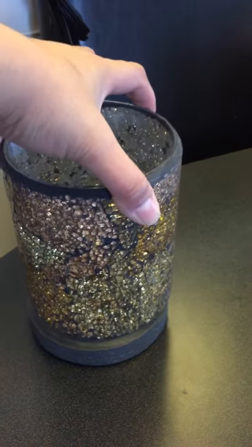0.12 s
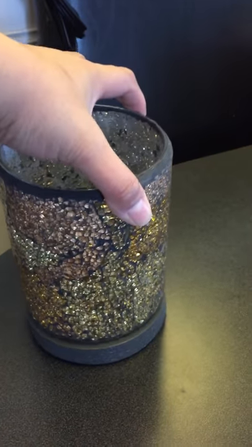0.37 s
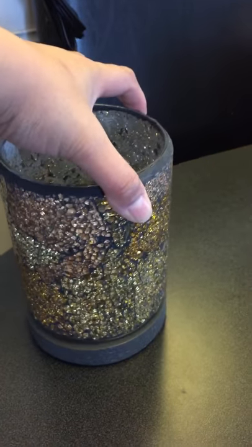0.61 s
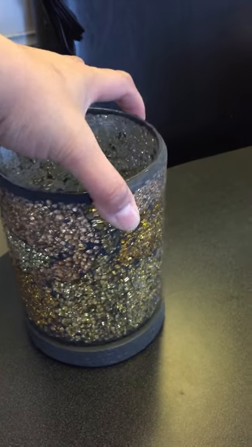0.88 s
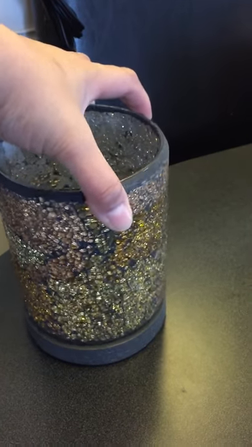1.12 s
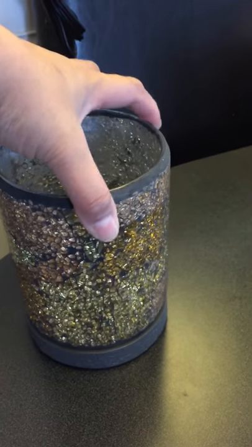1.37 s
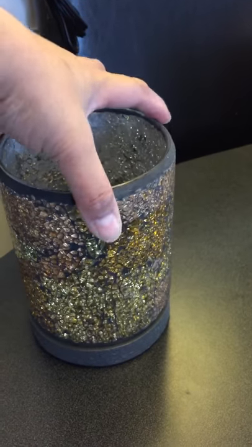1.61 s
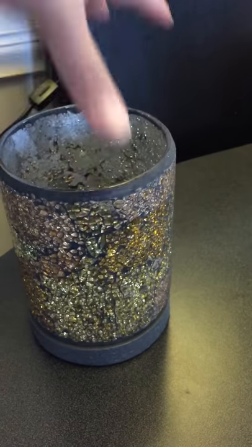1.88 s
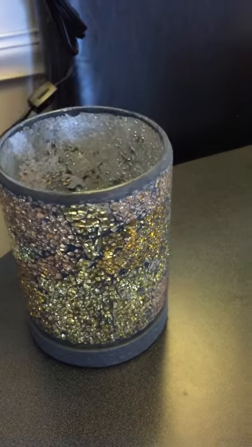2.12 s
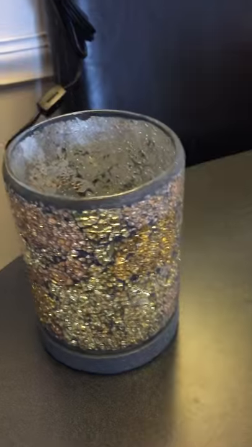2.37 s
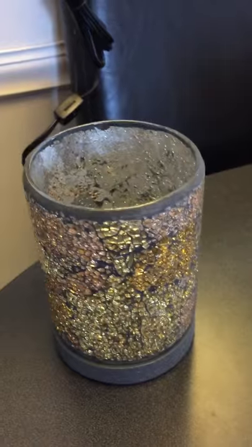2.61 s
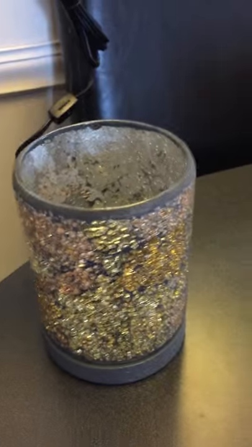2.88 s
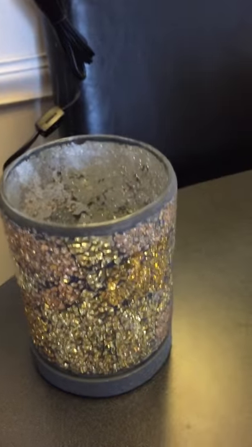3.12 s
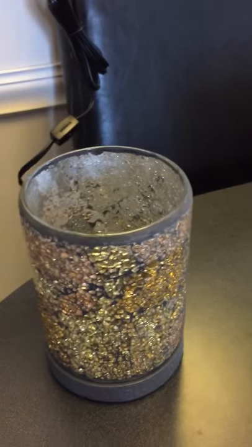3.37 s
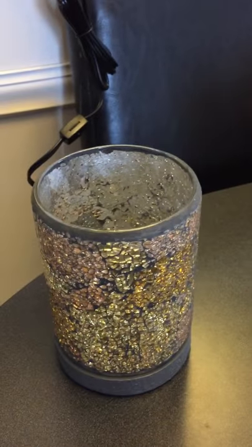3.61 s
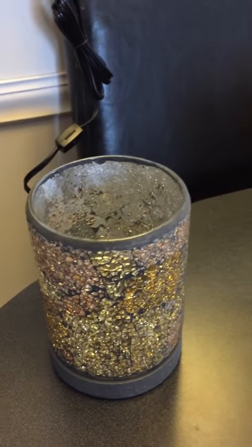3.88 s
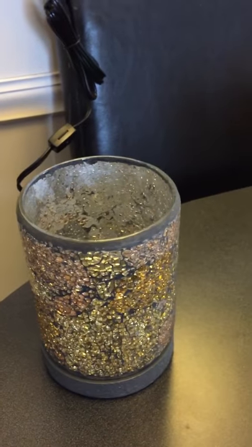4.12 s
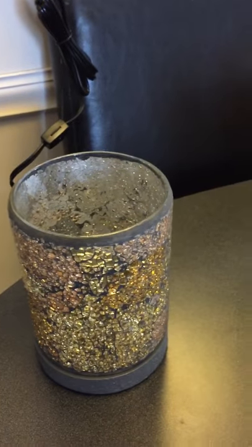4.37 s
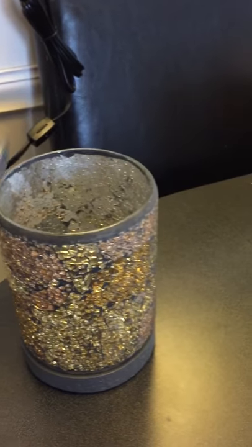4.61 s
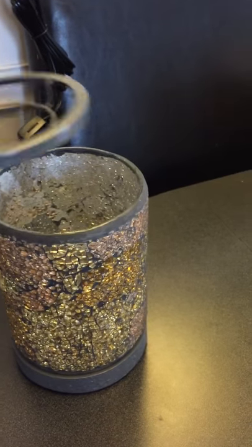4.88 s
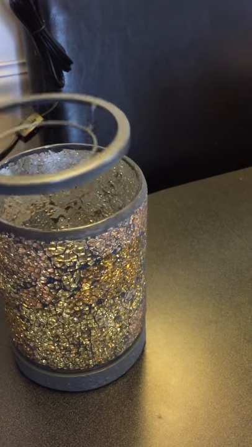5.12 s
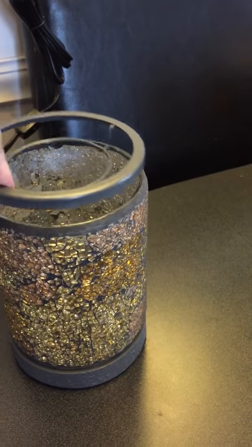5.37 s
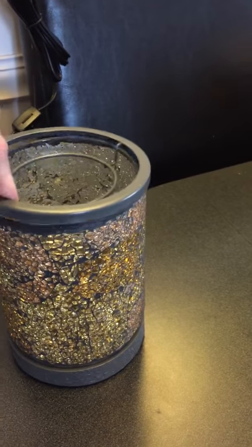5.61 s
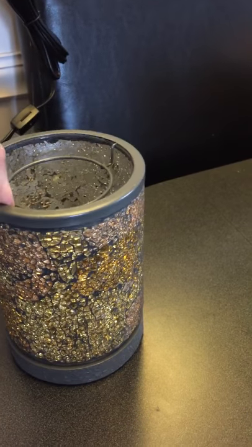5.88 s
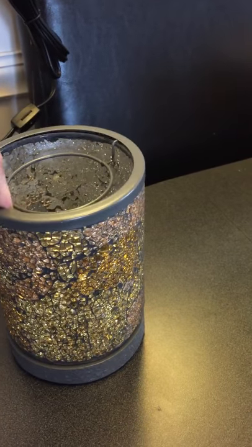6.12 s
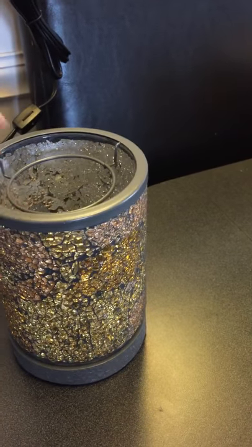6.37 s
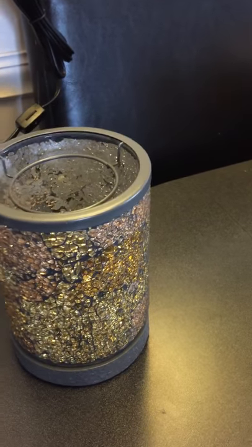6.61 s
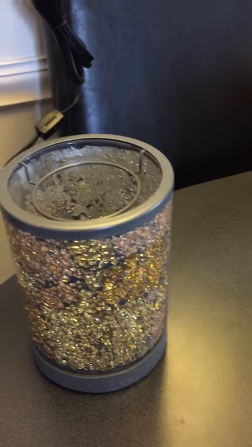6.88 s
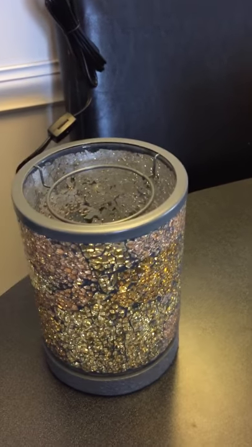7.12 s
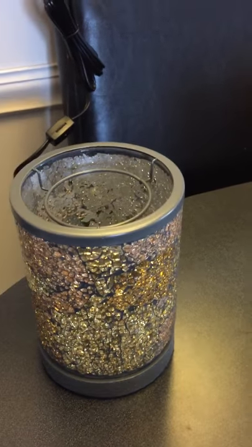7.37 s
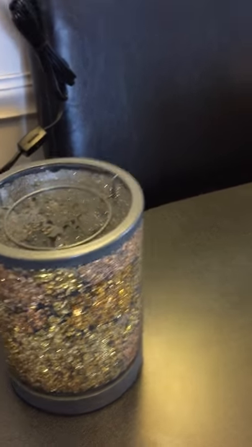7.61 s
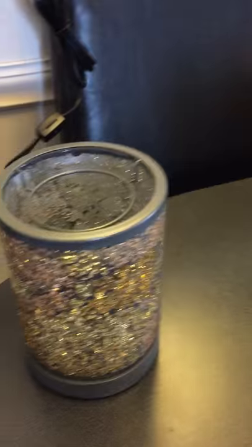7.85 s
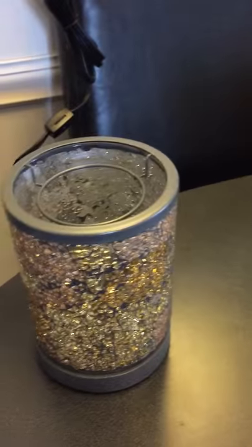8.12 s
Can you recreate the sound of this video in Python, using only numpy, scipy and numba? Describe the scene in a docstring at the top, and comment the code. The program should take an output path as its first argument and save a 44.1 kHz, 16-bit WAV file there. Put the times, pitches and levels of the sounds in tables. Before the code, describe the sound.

A glass lamp shade clacks and rocks onto its base, a metal ring scrapes and clinks into its rim, then a dish knocks; a clock ticks.

```python
"""Glass shade, metal ring and dish on a table

A hand seats a glass lamp shade on its base and lets it rock to rest; a metal ring is dragged off the table and
dropped into the rim; then a dish is slid and knocked about. A wall clock ticks over hum and hiss.
Blows excite banks of decaying modes plus a short noise clack; rubbing is random grit driving the same bodies.
Hum is wavering sines, hiss is coloured noise, and a decaying noise tail makes the room."""
import sys
import numpy as np
from scipy import signal
from scipy.fft import rfft, irfft
from scipy.io import wavfile
from scipy.ndimage import uniform_filter1d
from numba import njit

SR = 44100
rng = np.random.default_rng(int(sys.argv[2]) if len(sys.argv) > 2 else 0)


def to_wav(s):
    """Save 16-bit WAV."""
    ch = np.atleast_2d(s).T  # columns
    pcm = np.round(np.clip(ch, -1, 1) * 32767)  # PCM
    wavfile.write(sys.argv[1], SR, pcm.astype(np.int16))


def gain_from_decibels(decibels):
    """Convert decibel values to linear amplitude factors."""
    exponent = np.asarray(decibels, float) / 20
    return 10 ** exponent


N = 363384


def colour(x, points):
    """Minimum-phase filter, made by folding the cepstrum of a gain given as (f/Hz, level/dB) points."""
    hz, db = np.transpose(points)
    log_hz = np.log(np.linspace(1, SR / 2, 2049))
    cepstrum = irfft(np.interp(log_hz, np.log(hz), db) * np.log(10) / 20)
    cepstrum[1:2048] *= 2
    cepstrum[2049:] = 0
    return signal.fftconvolve(x, irfft(np.exp(rfft(cepstrum))))[:len(x)]


def level(x, db):
    """Set the rms."""
    return x * gain_from_decibels(db) / np.sqrt(np.mean(x ** 2))


def add(out, s, sound, peak_db):
    """Mix a sound in at time s with the given peak."""
    i = int(s * SR)
    out[i:i + len(sound)] += (sound * gain_from_decibels(peak_db) / np.abs(sound).max())[:N - i]


@njit
def resonate(force, poles, gains):
    """A bank of decaying modes driven by a force."""
    out = np.zeros(len(force))
    for p, g in zip(poles, gains):
        z = 0j
        for i in range(len(force)):
            z = z * p + force[i]
            out[i] += g * z.imag
    return out


SCATTER_DB, DETUNE = 2.5, .003  # per blow: default level spread, relative pitch spread of the modes


def ring_modes(force, modes, share=0.7, bright_hz=None, focus_db=11, scatter_db=SCATTER_DB):
    """Neighbouring modes start in opposite directions; where the contact lands decides which are strong.

    share scales every t60; focus_db is lost per octave away from bright_hz."""
    hz, db, t60_s = np.transpose(modes)
    if bright_hz:
        db = db - focus_db * np.abs(np.log2(hz / bright_hz))
    hz = hz * (1 + DETUNE * rng.standard_normal(len(hz)))
    decay = np.log(1000) / (t60_s * max(share, .05) * SR)
    poles = np.exp(2j * np.pi * hz / SR - decay)
    signs = (-1.) ** np.arange(len(hz))
    gains = signs * gain_from_decibels(db + scatter_db * rng.standard_normal(len(hz)))
    return resonate(force, poles, gains)


def push(ms):
    """Force of a blow: swells to its peak in ms (two samples at least), then lets go; soft contacts are slower."""
    u = np.arange(SR // 2) / SR / max(ms / 2000, 1 / SR)
    return u ** 2 * np.exp(-u)


def blow(ms, modes, share, clack_db, clack_ms, bright_hz=None, focus_db=10.0):
    """The modes of a struck thing, and the dense short clack of all those too close to tell apart."""
    force = push(ms)
    tone = ring_modes(force, modes, share, bright_hz, focus_db)
    fade = np.exp(-np.arange(len(force)) / (clack_ms * SR / 1000))
    dense = rng.standard_normal(len(force)) * fade
    clack = signal.fftconvolve(np.diff(dense, prepend=0), force)[:len(force)]
    return tone / np.abs(tone).max() + gain_from_decibels(clack_db) * clack / np.abs(clack).max()


def tick(hz, fade_ms):
    """Dry crack of two hard edges: fading noise in a wide band around hz."""
    t = np.arange(SR // 10) / SR
    noise = rng.standard_normal(len(t)) * np.exp(-1000 * t / fade_ms)
    edges_hz = [min(0.61 * hz, SR / 4), min(1.9 * hz, SR / 2.2)]
    return signal.sosfilt(signal.butter(2, edges_hz, "band", fs=SR, output="sos"), noise)


def grit(n, rate_hz, spread_db):
    """Friction over a rough top: dense small catches of random sign and uneven size."""
    chance = rng.random((3, n))
    size_db = np.minimum(-spread_db * np.log(1 - chance[2]), 14)
    return (chance[0] < rate_hz / SR) * np.sign(chance[1] - .5) * gain_from_decibels(size_db)


def rub(force, response):
    """A body, its response scaled to unit energy, driven by a rubbing force."""
    return signal.fftconvolve(force, response / np.sqrt(np.sum(response ** 2)))[:len(force)]


def strokes(rows):
    """Start sample and gain of a movement made of strokes that swell, hold and fade."""
    s, hold_s, db, swell, fade = np.transpose(rows)[:, :, None]
    i = int((s.min() - .1) * SR)
    t = np.arange(i, min(int((s.max() + .3) * SR), N)) / SR
    gain_db = db - swell * np.maximum(s - t, 0) - fade * np.maximum(t - s - hold_s, 0)
    return i, gain_from_decibels(gain_db).max(axis=0)


def walk(rate_hz):
    """Random levels, one each 1 / rate_hz s, joined by straight lines."""
    k = int(SR / rate_hz)
    return uniform_filter1d(np.repeat(rng.standard_normal(N // k + 1), k), k)[:N]


# room rumble and hiss spectrum: f/Hz, relative level/dB
HUSH_SPECTRUM = [(15, -39), (25, -6), (123, -4), (170, -8.5), (394, -17), (463, -18.5), (1230, -21),
                 (1330, -23.5), (1440, -20.5), (4250, -24.5), (4870, -28), (5880, -26), (10700, -32),
                 (13200, -31), (16000, -35.5)]
HUSH_RMS_DB = -68
# mains hum partials: f/Hz, mean level/dB
HUM_PARTIALS = [(120.5, -68.5), (1322, -87.5)]


def hush():
    """Room rumble and microphone hiss as coloured noise; mains hum as sines wavering in level and phase."""
    t = np.arange(N) / SR
    hum = np.zeros(N)
    for hz, db in HUM_PARTIALS:
        hum += gain_from_decibels(db + 2.0 * walk(8.9)) * np.sin(2 * np.pi * hz * t + 0.75 * walk(5.6))
    return level(colour(rng.standard_normal(N), HUSH_SPECTRUM), HUSH_RMS_DB) + hum


# clock ticks, a row a second: step peak level/dB, catch peak level/dB
CLOCK_TICKS = [(-48.5, -54), (-56, -55.5), (-54, -56), (-49.5, -51.5), (-48.5, -60.5), (-53, -55.5),
               (-45, -56), (-56.5, -57.5), (-46.5, -55)]
# clock modes: f/Hz, relative level/dB, t60/s at share 1
CLOCK_MODES = [(442, -1, 0.028), (658, -0.5, 0.033), (1265, -9, 0.041), (1813, -3, 0.024), (2212, 1, 0.023),
               (2852, -6, 0.041), (5570, -12, 0.046)]
FIRST_TICK_S, STEP_HZ, CATCH_LATE_S, COIL_S = .0785, 1330, .022, .013


def clock():
    """Once a second the coil hums up, the motor steps, the gears rattle, and the train catches."""
    out = np.zeros(N)
    t = np.arange(SR // 4) / SR
    for second, (step_db, catch_db) in enumerate(CLOCK_TICKS):
        s = FIRST_TICK_S + second
        coil = grit(len(t), 2900, 3.5) * (t < COIL_S)
        add(out, s - COIL_S, ring_modes(coil, CLOCK_MODES[2:3], 0.7), step_db - 16)
        add(out, s, blow(0.17, CLOCK_MODES[2:], 0.62, -22, 4, STEP_HZ, 15.), step_db)
        rattle = grit(len(t), 1500, 1.1) * t * np.exp(-t / 0.019)
        add(out, s, ring_modes(rattle, CLOCK_MODES, 0.52), catch_db - 5.0)
        add(out, s + CATCH_LATE_S, blow(0.074, CLOCK_MODES, 0.57, 0.39, 4.9), catch_db)
    return out


# shade against base: t/s, clack peak level/dB, table thud peak level/dB, contact/ms, strongest f/Hz
SHADE_KNOCKS = [(0.378, -37.5, -48, 0.21, 626), (.444, -22, -34.5, 0.22, 750),
                (0.583, -51.5, -57, 0.46, 600), (0.653, -44, -54, 0.22, 384), (.856, -51, -51, 0.26, 298),
                (0.94, -34.5, -54, 0.42, 650), (1.096, -41, -50, 0.35, 580), (1.149, -55, -76, 0.31, 600),
                (1.25, -54.5, -70, 0.36, 910), (1.321, -54, -73, 0.21, 650), (1.436, -51.5, -70, 0.25, 410),
                (1.465, -57.5, -68, 0.19, 700), (1.578, -42.5, -70, 0.58, 630),
                (3.281, -41, -61, 0.11, 278)]
# shade let go, rocking from edge to edge: t/s, clack peak level/dB
SHADE_ROCKS = [(1.728, -49.5), (1.779, -43), (1.827, -49), (1.869, -48.5), (1.91, -54), (1.947, -48),
               (2.014, -54), (2.076, -60)]
ROCK_MS, ROCK_HZ, ROCK_THUD_DB = 0.49, 600, -30  # thud re clack
# table rumble under the wobble: t/s at full force, hold/s, rms level/dB, swell/(dB/s), fade/(dB/s)
WOBBLE_STROKES = [(1.47, 0.018, -60, 350, 500), (1.585, 0.033, -47.5, 800, 650),
                  (1.745, 0.018, -55.5, 450, 250), (1.85, 0.14, -63.5, 500, 400),
                  (2.014, .01, -54, 250, 150), (2.115, 0.091, -61, 300, 550)]
# base modes: f/Hz, relative level/dB, t60/s at share 1
BASE_MODES = [(250, -3, .07), (330, -6, .1), (420, -8, .05), (590, -3, .035), (650, 0, .035),
              (851, -10, .045), (953, -7, .06), (1297, -7, .06), (1500, -1, .04), (1873, 2, .16),
              (1949, 5, .12), (2083, 4, .16), (2300, 7, .06), (3015, 14, .05), (3138, 8, .1),
              (4070, 5, .04)]
# table top modes: f/Hz, relative level/dB, t60/s at share 1
TABLE_MODES = [(75.3, -16, 0.19), (131, -4, 0.16), (147.5, -1.5, 0.048), (222, -7.5, 0.072),
               (334.2, -8, 0.22)]
# a shorter contact rings longer: t60 share at CONTACT_MS, factor per halving of the contact
CONTACT_MS, KNOCK_SHARE, SHARE_PER_HALVING = .3, 0.61, 1.26


def shade():
    """The glass clacks on the base, whose modes ring, and the table top booms under it."""
    out = np.zeros(N)
    rocks = [(s, db, db + ROCK_THUD_DB, ROCK_MS, ROCK_HZ) for s, db in SHADE_ROCKS]
    for s, clack_db, thud_db, ms, bright_hz in SHADE_KNOCKS + rocks:
        share = KNOCK_SHARE * SHARE_PER_HALVING ** np.log2(CONTACT_MS / ms)
        add(out, s, blow(ms, BASE_MODES, share, -16, 12.2, bright_hz, 11.8), clack_db)
        add(out, s + 0.0052, ring_modes(push(1.0), TABLE_MODES), thud_db)
    i, gain = strokes(WOBBLE_STROKES)
    rumble = ring_modes(rng.standard_normal(len(gain)), TABLE_MODES[1:3], 0.7)
    out[i:i + len(gain)] += gain * level(rumble, 0)
    return out


# faint treble scuffs, perhaps skin or cloth: t/s, peak level/dB, f/Hz
SCUFF_EVENTS = [(0.652, -62, 6340), (1.238, -62, 6400), (1.33, -64, 7450), (1.7, -62, 7500),
                (4.3, -61.5, 7400), (7.592, -59.5, 7040)]


def scuffs():
    """Short faint hisses: fading noise in a narrow treble band."""
    out = np.zeros(N)
    for s, db, hz in SCUFF_EVENTS:
        band = signal.butter(2, [hz / 1.58, hz * 1.32], "band", fs=SR, output="sos")
        add(out, s, signal.sosfilt(band, tick(hz, 19)), db)
    return out


# ring against board or rim: t/s, peak level/dB of what is hit, metal peak level/dB, tick peak level/dB,
# t60 share of what is hit, brightest metal f/Hz
RING_CLINKS = [(3.392, -24, -28.5, -47, 0.7, 9200), (3.407, -22.5, -46, -48, 0.085, 4500),
               (3.439, -31, -40, -58, 0.65, 6660), (3.568, -33.5, -66, -71, 0.68, 4400),
               (3.585, -38, -45.5, -53, 0.37, 3910), (3.619, -29, -46.5, -54.5, 0.68, 8540),
               (5.808, -34.5, -54.5, -73, 0.57, 4270), (5.817, -35.5, -71, -72, 1.65, 4330),
               (6.006, -36, -54, -63, 0.2, 6100), (6.019, -41.5, -70, -75, 0.36, 6100),
               (6.153, -55, -60, -38.5, 0.43, 13200), (6.161, -45.5, -59, -35.5, 1.2, 11000),
               (6.169, -32, -45.5, -56, 0.07, 4330), (6.226, -30, -32, -41, 0.42, 7900),
               (6.301, -38.5, -75, -72, 0.086, 4100), (6.311, -52, -45, -46, 0.73, 9900),
               (6.333, -38.5, -47, -33.5, 1.14, 6500), (6.342, -32.5, -39, -61, 0.095, 6050)]
# drag strokes: t/s at full force, hold/s, force level/dB, swell/(dB/s), fade/(dB/s)
DRAG_STROKES = [(3.35, .02, -68.5, 248, 299.5), (3.376, .01, -56.5, 600, 300.5),
                (3.393, 0.051, -33.5, 5000, 253), (3.571, .004, -43, 2499, 1199),
                (3.59, .04, -40, 3000, 323)]
# metal ring modes: f/Hz, relative level/dB, t60/s at share 1
METAL_MODES = [(4027, -9, .07), (4129, -10, .15), (4452, -8, .3), (5380, -12, .15), (6099, -7, .22),
               (6589, -6, .25), (6826, 0, .3), (7615, -4, .2), (7980, -8, .2), (8570, -2, .3),
               (9100, -12, .2), (9846, -3, .22), (10430, -10, .3), (11300, -10, .15), (11950, -9, .12),
               (13100, -10, .08), (14300, -12, .08)]
# glass shade modes: f/Hz, relative level/dB, t60/s at share 1
GLASS_MODES = [(420, -19, .06), (635, 0, .09), (690, -7, .06), (1150, -13, .05), (1500, -5, .075),
               (2000, -10, .04), (2540, -1, .05), (2900, -3, .05), (3170, 0, .07), (4450, 6, .05)]
# board modes: f/Hz, relative level/dB, t60/s at share 1
BOARD_MODES = [(679.3, -5.5, 0.08), (1360, -22.5, 0.15), (1600, -9.5, 0.042), (2083, -3, 0.034),
               (2863, -17.5, 0.066)]
# board rasp spectrum: f/Hz, relative level/dB
BOARD_RASP = [(59, -45), (100, -21.5), (477, -11.5), (560, -23), (684, 0), (772, -11), (1690, -14),
              (3910, -24.5), (4970, -30), (6850, -26), (12000, -53.5), (15600, -87.5), (22000, -120)]
GLASS_HZ, GLASS_FOCUS_DB = 640, 2.2
HARDEST_CONTACT_MS, DB_PER_DOUBLING = .05, 16  # the less the metal rings, the longer the contact
ON_RIM_S, METAL_SHARE_FREE, METAL_SHARE_ON_RIM = 5, .5, 0.24
GRIPPED_S, SING_DB, GRIPPED_DB = 3.54, -5.5, -25.5  # the metal sings while the ring is loose


def metal_ring():
    """Dragged, it rasps on the board and sings; dropped on the rim, it rings with the glass."""
    out = np.zeros(N)
    for s, hit_db, metal_db, tick_db, hit_share, bright_hz in RING_CLINKS:
        hit_modes, metal_share = GLASS_MODES, METAL_SHARE_ON_RIM
        if s < ON_RIM_S:
            hit_modes, metal_share = BOARD_MODES, METAL_SHARE_FREE
        ms = HARDEST_CONTACT_MS * 2 ** np.clip((hit_db - metal_db) / DB_PER_DOUBLING, 0, 2)
        add(out, s, blow(ms, hit_modes, hit_share, -12.5, 8.3, GLASS_HZ, GLASS_FOCUS_DB), hit_db)
        add(out, s + 0.00557, ring_modes(push(0.92), TABLE_MODES[1:]), hit_db - 18)
        add(out, s, ring_modes(push(.025), METAL_MODES, metal_share, bright_hz), metal_db)
        add(out, s, tick(bright_hz, 6), tick_db)
    i, gain = strokes(DRAG_STROKES)
    force, tap = gain * level(grit(len(gain), 1400, 3.5), 0), push(0)
    rasp = gain_from_decibels(5.5) * rub(force, colour(tap, BOARD_RASP))
    board = gain_from_decibels(1.0) * rub(force, ring_modes(tap, BOARD_MODES, 0.96, scatter_db=0.5))
    sing_db = np.where(i + np.arange(len(gain)) < GRIPPED_S * SR, SING_DB, GRIPPED_DB)
    song = rub(force * gain_from_decibels(sing_db), ring_modes(tap, METAL_MODES, 0.22, scatter_db=1.5))
    out[i:i + len(gain)] += rasp + board + song
    return out


# dish against table: t/s, peak level/dB before the high-pass, contact/ms, t60 share, strongest f/Hz
DISH_BUMPS = [(7.579, -50, 0.22, 0.46, 700), (7.592, -44, 0.14, 0.094, 885),
              (7.675, -43.5, 0.59, 0.42, 600), (7.711, -37, 0.2, 0.3, 1000), (7.727, -25, 0.46, 0.3, 754),
              (7.838, -20.5, .10, .9, 1300), (7.889, -29.5, 0.47, 0.16, 860),
              (8.168, -28.5, 0.87, 0.6, 765), (8.204, -16, 0.14, 0.26, 950), (8.221, -36, 0.19, 0.63, 1200)]
# slide strokes: t/s at full force, hold/s, force level/dB, swell/(dB/s), fade/(dB/s)
SLIDE_STROKES = [(7.715, 0.016, -41.5, 1020, 330), (7.842, 0.0046, -33.5, 9000, 800),
                 (7.87, 0.036, -51, 900, 250), (7.96, 0.026, -56, 300, 300), (8.08, 0.027, -63, 200, 200),
                 (8.168, 0.013, -47.5, 2400, 200), (8.207, .01, -32.5, 6000, 300)]
# dish modes: f/Hz, relative level/dB, t60/s at share 1
DISH_MODES = [(200, -14, .1), (325, -12, .15), (501, -9, .4), (549, -4, .16), (662, -5, .15),
              (824, -3, .12), (894, 0, .12), (1061, -4, .14), (1147, -3, .12), (1217, 1, .12),
              (1534, -1, .12), (1674, 1, .12), (1954, -2, .12), (2363, -6, .1), (2620, -8, .4),
              (2900, -10, .07), (3500, -10, .06), (4200, -12, .05), (5680, 4, .14)]
# dish rasp spectrum: f/Hz, relative level/dB
DISH_RASP_SPECTRUM = [(88, -54), (200, 0), (600, -5.5), (1500, -0.5), (3000, -18.5), (5500, -32),
                      (9000, -46), (20000, -64)]


def dish():
    """It rasps as it slides and rings dully when it bumps; so small a thing radiates no bass."""
    out = np.zeros(N)
    for s, db, ms, share, bright_hz in DISH_BUMPS:
        add(out, s, blow(ms, DISH_MODES, share, -31.5, 14, bright_hz), db)
    i, gain = strokes(SLIDE_STROKES)
    force = gain * level(grit(len(gain), 1100, 3.2), 0)
    response = ring_modes(push(0.14), DISH_MODES[:14], 0.29, 598, focus_db=8.5, scatter_db=2.0)
    body = gain_from_decibels(6.0) * rub(force, response)
    rasp = gain_from_decibels(-0.5) * rub(force, colour(push(0), DISH_RASP_SPECTRUM))
    out[i:i + len(gain)] += rasp + body
    return signal.sosfilt(signal.butter(2, 170, "high", fs=SR, output="sos"), out)


ROOM_T60_S, ROOM_TOP_HZ = 0.26, 4500
TABLE_ECHO_DB, CLOCK_ECHO_DB = -13, 0.054  # tail energy re direct sound


def room(x, echo_db):
    """A small furnished room: a quickly fading, dull noise tail."""
    t = np.arange(SR // 2) / SR
    tail = rng.standard_normal(len(t)) * gain_from_decibels(-60 * t / ROOM_T60_S) * (t > .004)
    tail = signal.sosfilt(signal.butter(1, ROOM_TOP_HZ, fs=SR, output="sos"), tail)
    return x + gain_from_decibels(echo_db) * signal.fftconvolve(x, tail / np.sqrt(np.sum(tail ** 2)))[:N]


def scene():
    """Near things on the table echo little; the far clock has as much echo as direct sound."""
    table_things = shade() + scuffs() + metal_ring() + dish()
    return (hush() + room(clock(), CLOCK_ECHO_DB) + room(table_things, TABLE_ECHO_DB))[None]


def roll_off(x):
    """The treble ends steeply here."""
    return signal.sosfilt(signal.butter(12, 16480, fs=SR, output="sos"), x)


def record(dry):
    """The deepest bass, below about 40 Hz, is taken away."""
    mix = signal.sosfilt(signal.butter(4, 40, "high", fs=SR, output="sos"), dry)
    return roll_off(mix)


dry = scene()
out = record(dry)
to_wav(out)
```